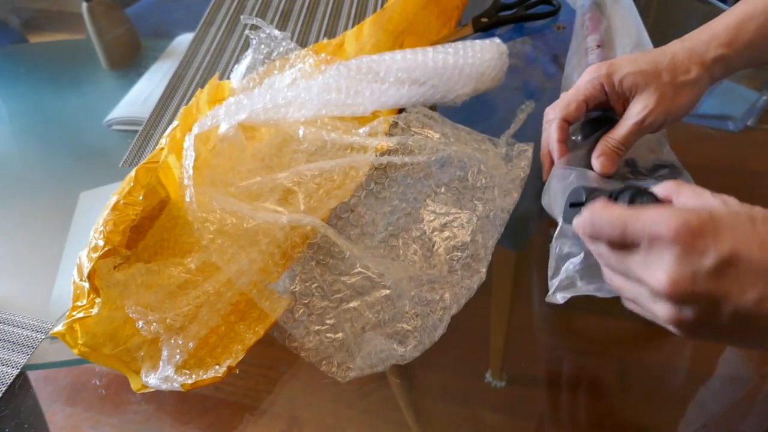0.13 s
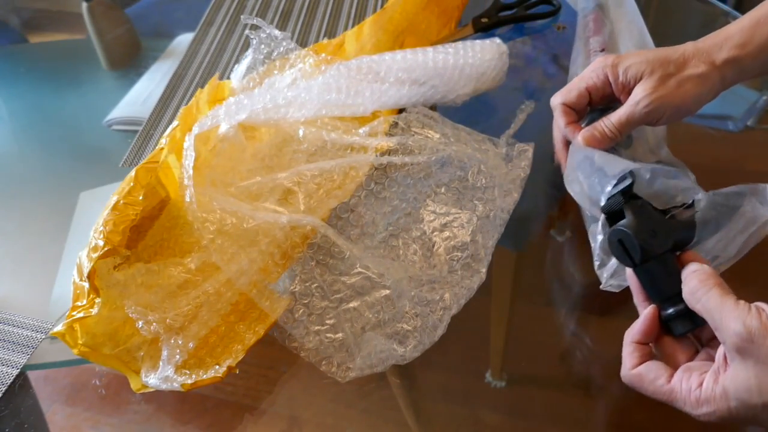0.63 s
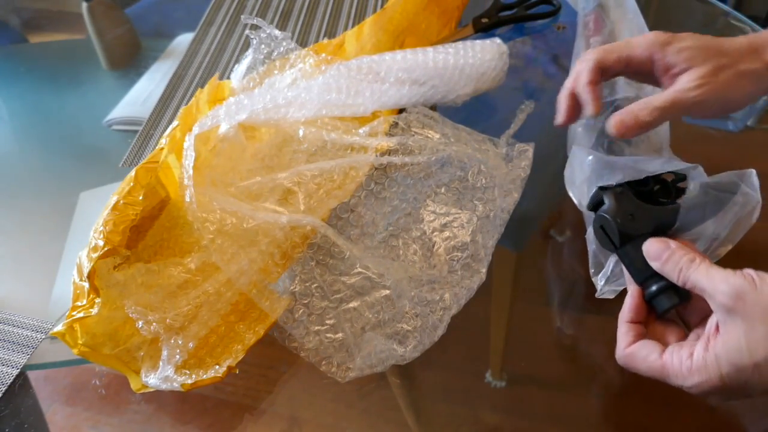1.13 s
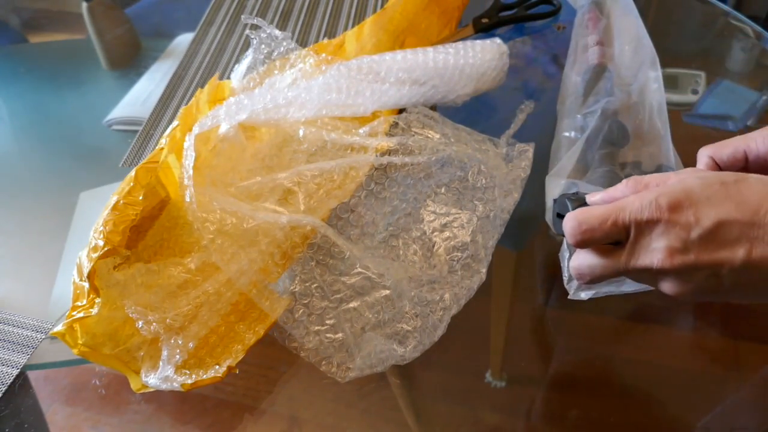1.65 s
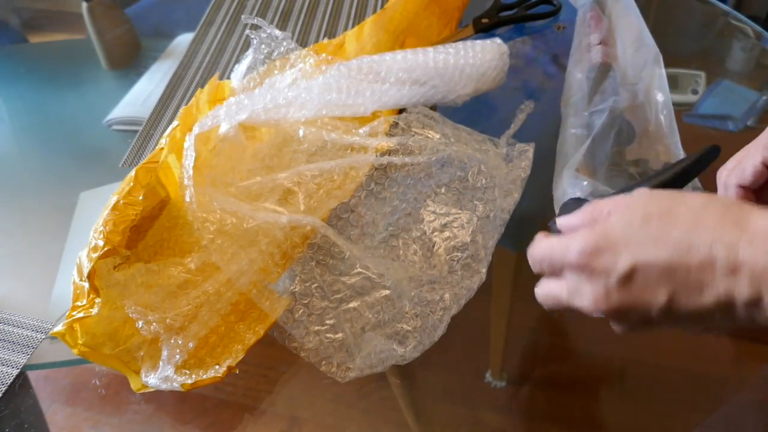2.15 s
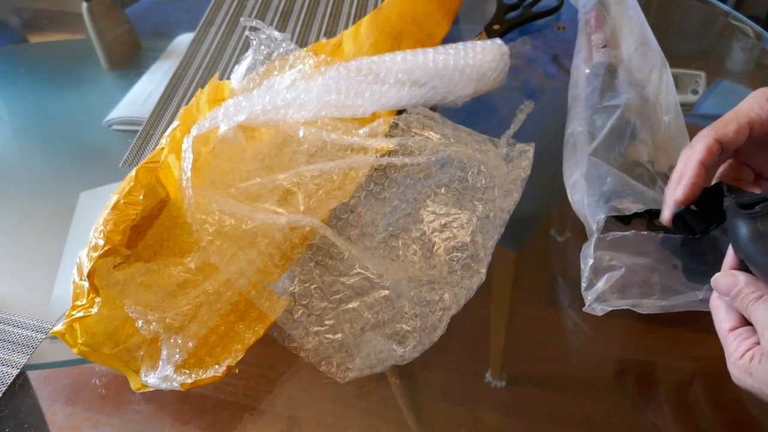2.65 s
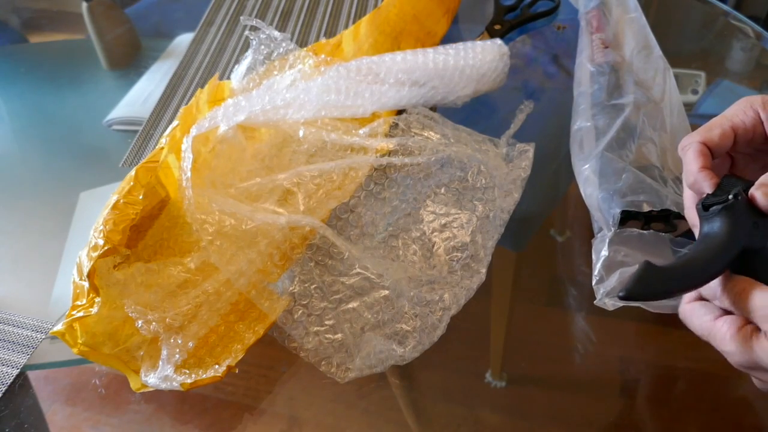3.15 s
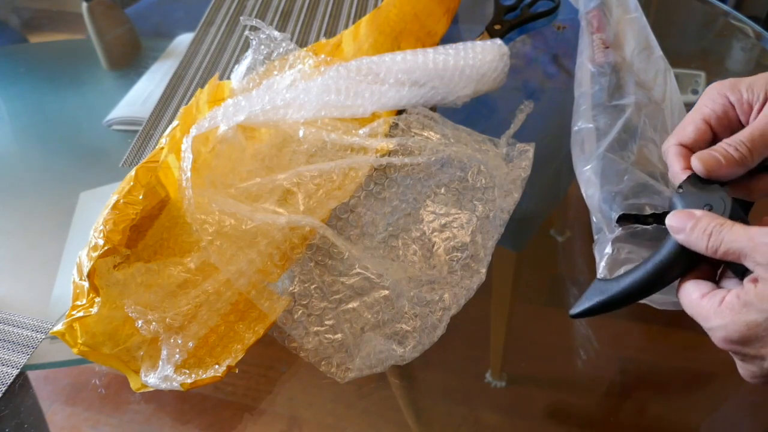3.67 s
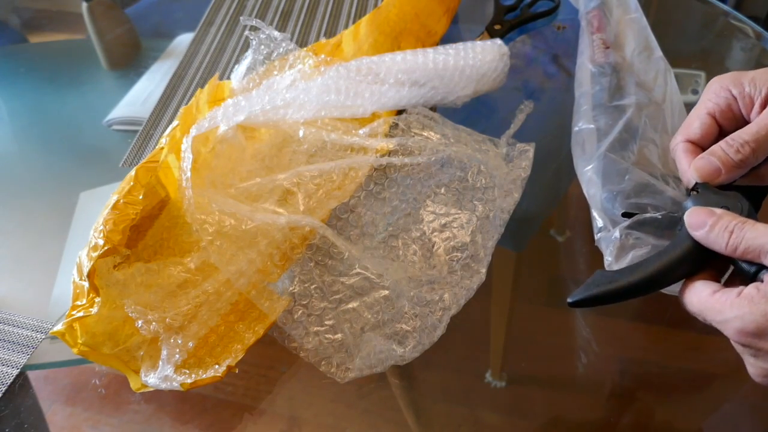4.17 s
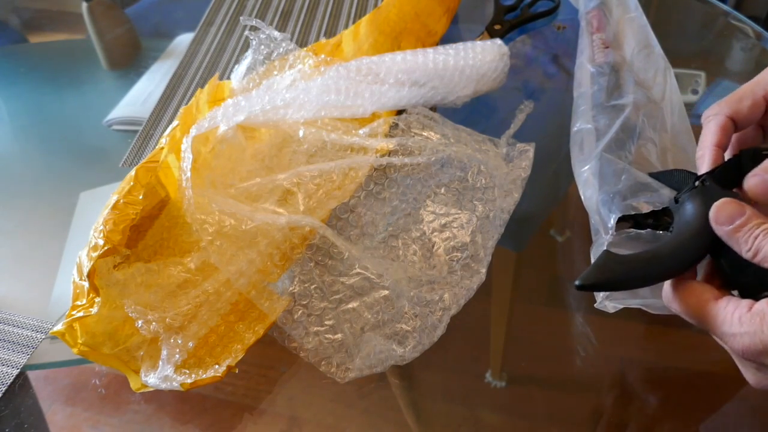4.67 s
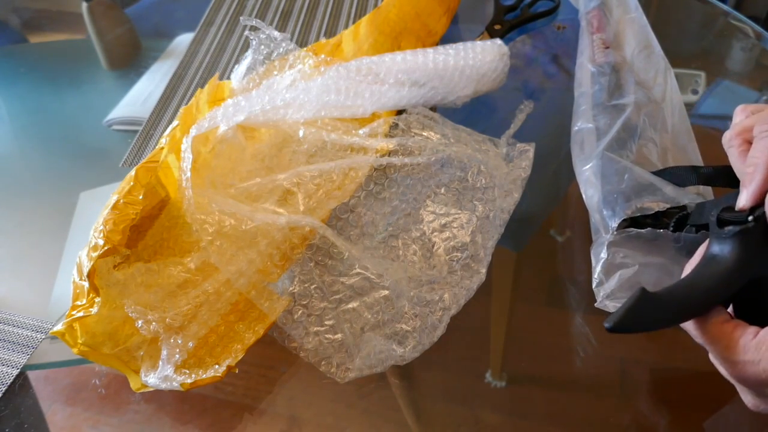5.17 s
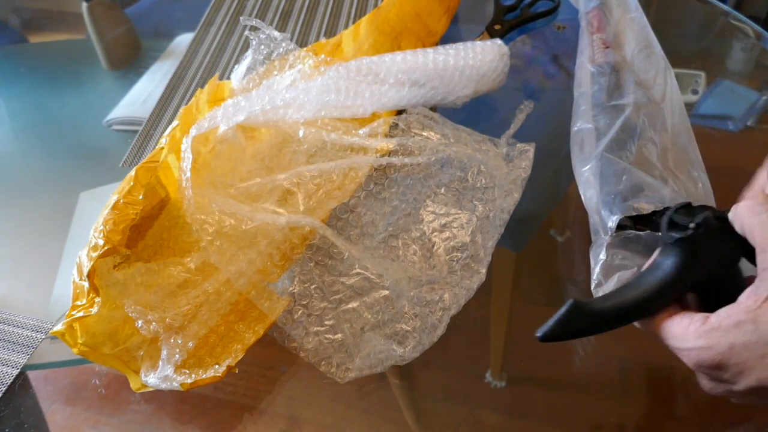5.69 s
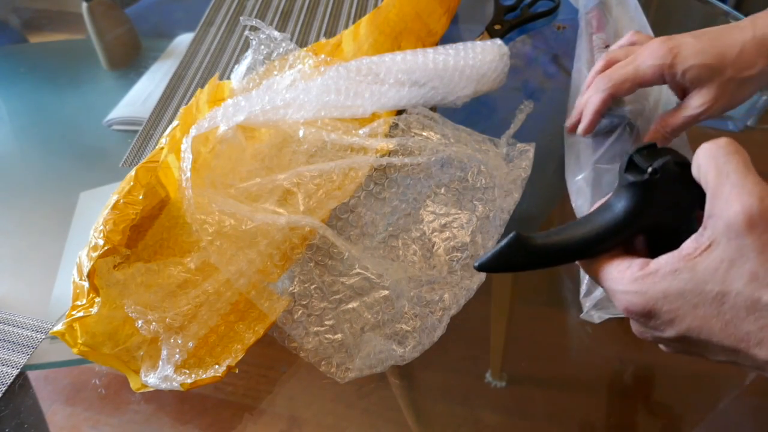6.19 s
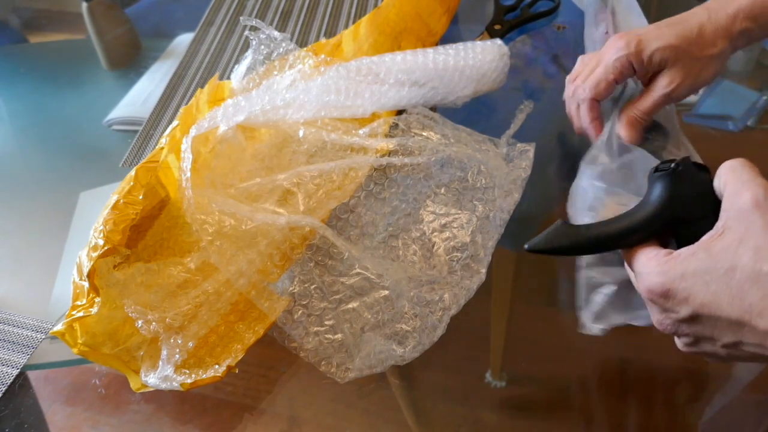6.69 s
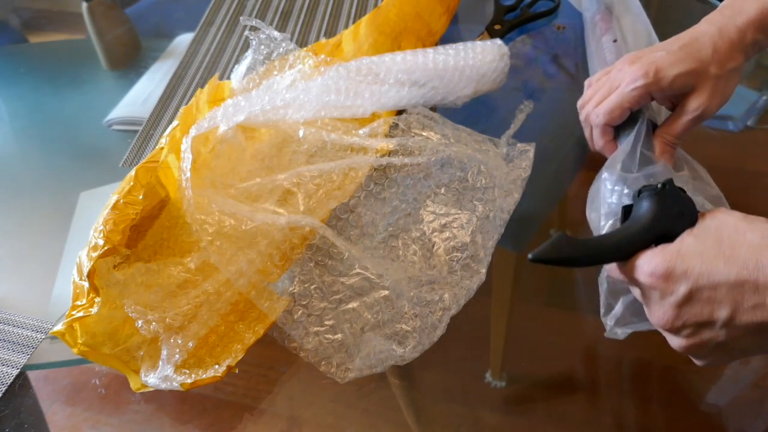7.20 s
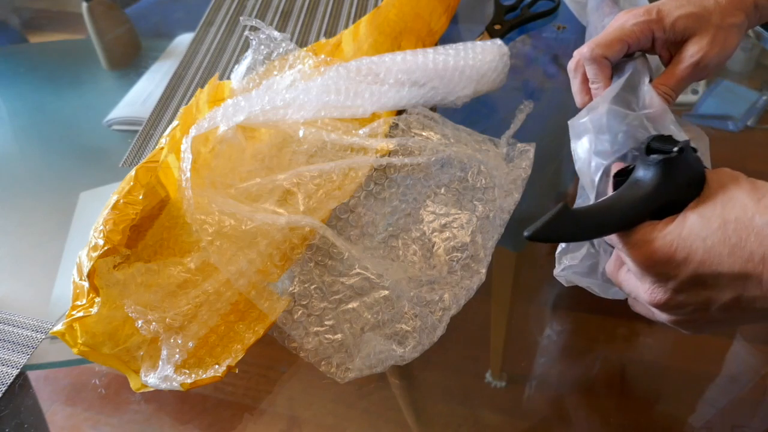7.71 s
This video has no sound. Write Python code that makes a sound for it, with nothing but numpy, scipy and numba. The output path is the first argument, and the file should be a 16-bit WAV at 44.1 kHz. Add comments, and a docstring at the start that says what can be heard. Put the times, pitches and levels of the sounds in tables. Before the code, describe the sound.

Close crackly plastic film rustling, one short rattling burst of hard knocks on a tabletop, a near-quiet lull with faint ticks, then vigorous crinkling again.

```python
"""Hands work at a thin plastic bag on a glass table, close to a small stereo microphone in a quiet room.
Bag: creases snap over singly or in showers, as short swelling rings and noise bursts coloured by the film.
Part: a hard plastic piece knocks on the table (decaying modes), with clacks, rattle and a rocking hum.
Room: a short noise tail behind both, over coloured noise and low booming notes.
Gain control turns loud moments down, most of all the knocks."""
import sys
import numpy as np
from scipy import signal
from scipy.fft import rfft, irfft, next_fast_len
from scipy.io import wavfile
from numba import njit

SR = 44100
rng = np.random.default_rng(int(sys.argv[2]) if len(sys.argv) > 2 else 0)


def voltage_ratio(decibels):
    """Convert decibels (scalar or array-like) to amplitude ratios, 20 dB per decade."""
    exponent = np.asarray(decibels, float) / 20
    return 10 ** exponent


def to_wav(sig):
    """Store sig (one row per channel, or 1-D mono) as 16-bit WAV at the path in sys.argv[1].

    Samples outside -1..1 are clipped; the rate is SR.
    """
    pcm = np.clip(np.atleast_2d(sig), -1, 1) * 32767
    pcm = np.round(pcm).astype(np.int16)
    wavfile.write(sys.argv[1], SR, pcm.T)  # frames by channels


N = 345289

# colour of the bag film: (frequency [Hz], relative level per Hz [dB])
FILM_COLOUR = [(88, -32.5), (150, 14), (183, -18), (210, -5.5), (393, -5), (434, -1), (847, -4.5),
               (934, -9), (2200, -6.5), (2920, -7), (4600, -12), (6050, -16.5), (10300, -20.5),
               (15000, -26), (16500, -52)]


def level(x, db):
    """Scale to an rms level in dB."""
    return x * voltage_ratio(db) / np.sqrt(np.mean(x ** 2))


def on_log(table, hz):
    """Read (frequency [Hz], value) points on a log frequency axis."""
    f, v = np.transpose(table)
    return np.interp(np.log(np.maximum(hz, 1)), np.log(np.maximum(f, 1)), v)


def colour(x, table):
    """Causal minimum-phase filter with the gain of (Hz, dB) points, from the folded cepstrum."""
    size = 2048
    log_gain = on_log(table, np.fft.rfftfreq(size, 1 / SR)) * np.log(10) / 20
    cepstrum = irfft(log_gain)
    cepstrum[1:size // 2] *= 2
    cepstrum[size // 2 + 1:] = 0
    response = irfft(np.exp(rfft(cepstrum)))[None, :size // 2]
    return signal.oaconvolve(x, response, axes=-1)[:, :N]


def band(x, lo_hz, hi_hz):
    """Gentle band-pass (second-order Butterworth prototype)."""
    return signal.sosfilt(signal.butter(2, [lo_hz, min(hi_hz, SR / 2.1)], "band", fs=SR, output="sos"), x)


def alike(size, like_hz):
    """Stereo noise: the side part is high-passed, so bass is common and treble unrelated."""
    mid, side = rng.standard_normal((2, size))
    side = signal.sosfilt(signal.butter(1, like_hz, "high", fs=SR, output="sos"), side)
    return np.array([mid + side, mid - side])


def hush():
    """Smooth background noise with booming notes, the lowest ones held steady by some motor."""
    # background colour: (frequency [Hz], relative level per Hz [dB])
    hush_colour = [(20, -11), (114, -16), (147, -6.5), (244, 1.5), (670, -13), (839, -10.5), (939, -15),
                   (1900, -19.5), (2890, -31), (7300, -41.5), (9950, -33), (12800, -35), (15200, -40),
                   (16500, -99)]
    # booming notes: (frequency [Hz], width [Hz], relative level [dB])
    hums = [(81, 16, -15.5), (117.6, 3.7, -10), (164.2, 8, -0.5), (205.8, 3.7, 1), (261.2, 9.8, -8.5),
            (415.8, 20, -2.5)]
    hush_db, hum_db = -49, -52.5
    notes, t = 0, np.arange(N) / SR
    for hz, width_hz, db in hums:
        steady_gain = voltage_ratio(db) / (1 + (hz / 200) ** 4)
        tone = np.sin(2 * np.pi * (hz * t + rng.random())) * steady_gain
        boom = band(alike(N, 750.0), hz - width_hz / 2, hz + width_hz / 2)
        notes = notes + tone + level(boom, db - 9.5)
    return level(colour(alike(N, 40.0), hush_colour), hush_db) + level(notes, hum_db)


def room(x):
    """Reverberation: x convolved with a noise tail that dies faster in the treble."""
    # reverberation time: (frequency [Hz], t60 [s])
    room_t60 = [(200, 0.31), (800, 0.29), (3000, 0.17), (10000, 0.14)]
    t = np.arange(SR // 2) / SR
    noise, tail = alike(len(t), 3800.0), 0
    for hz in 125 * 2. ** np.arange(8):
        decay = np.exp(-np.log(1000) * t / on_log(room_t60, hz))
        tail = tail + band(noise, hz / np.sqrt(2), hz * np.sqrt(2)) * decay
    tail = tail * np.minimum(t / 0.0037, 1)  # onset [s]
    unit_tail = tail / np.sqrt(np.sum(tail ** 2) / 2)
    return signal.oaconvolve(x[None], unit_tail, axes=-1)[:, :N]


def ports(x):
    """The two microphone ports colour and delay a near sound differently, each by half the contrast."""
    # phase contrast: (frequency [Hz], left lead [rad])
    port_phase = [(0, 0), (600, -0.3), (1720, 0.1), (4570, 0.1), (5170, 0.3), (5600, 0.7), (6030, 2.1),
                  (6550, 2.3), (7840, 1.9), (9730, 0.7), (12100, 0.3), (16200, 0.1)]
    # level contrast: (frequency [Hz], left minus right [dB])
    port_balance = [(110, 4), (200, 0), (380, 0), (700, -2), (1290, -5), (2380, 0), (4400, -3), (8120, 1.5),
                    (15000, 3.5)]
    size = next_fast_len(N)
    hz = np.fft.rfftfreq(size, 1 / SR)
    half = voltage_ratio(on_log(port_balance, hz) / 2) * np.exp(.5j * on_log(port_phase, hz))
    return irfft(rfft(x, size) * np.array([half, 1 / half]), size)[:, :N]


@njit
def rings(n, start, hz, fade, peak, lag, lean, turn):
    """Short rings that swell and die (t e^-t); right port lags by lag; start, fade, lag in samples."""
    out = np.zeros((2, n))
    for k in range(len(start)):
        step = np.exp(2j * np.pi * hz[k] / SR - 1 / fade[k])
        for ch in range(2):
            at = start[k] + ch * lag[k]
            i = int(np.ceil(at))
            age = i - at
            gain = peak[k] * lean[k] ** (1 - 2 * ch)
            z = gain * np.exp(1j * turn[k] + 1) / fade[k] * step ** age
            for j in range(max(i, 0), min(i + int(9 * fade[k]) + 2, n)):
                out[ch, j] += age * z.imag
                z *= step
                age += 1
    return out


def spray(s, peak, swell_ms, lo_hz, hi_hz):
    """Bursts of noise with the film's colour, each swelling for swell_ms and dying."""
    zero = np.zeros(len(s))
    # zero pitch and a quarter turn leave the bare t e^-t envelope
    shape = rings(N, s * SR, zero, zero + swell_ms * SR / 1000, peak, zero, zero + 1, zero + np.pi / 2)
    noise = band(colour(alike(N, 7800.0), FILM_COLOUR), lo_hz, hi_hz)
    return shape * level(noise, -5.0)


def rocking():
    """The part rocks on and keeps the lowest mode humming, as a sine of rising pitch."""
    start_s, attack_s, db = 2.79, 0.014, -23.5
    hz, rise_hz_per_s = 247, 155
    age = np.maximum(np.arange(N) / SR - start_s, 0)
    cycles = age * (hz + rise_hz_per_s * age / 2)
    return voltage_ratio(db) * np.minimum(age / attack_s, 1) * np.sin(2 * np.pi * cycles)


def knocks():
    """Every blow rings the same modes; a longer contact leaves the upper ones out; hard edges clack."""
    # blows of the part: (time [s], blow level [dB], contact [ms], clack level [dB])
    blows = [(2.612, -9.5, 0.33, -35), (2.617, -6, 0.22, -34), (2.627, -6.5, 0.27, -50),
             (2.651, -12, 0.35, -60), (2.663, -11, 0.26, -59.5), (2.683, -13.5, 0.36, -60),
             (2.699, -17, 0.32, -60), (2.722, -22.5, 0.074, -10), (2.734, -20, 0.06, -22),
             (2.746, -10, 0.46, -39), (2.763, -20.5, 0.22, -26), (2.797, -13, 0.66, -29.5),
             (2.82, -22, 0.43, -39), (2.845, -22.5, 0.3, -45)]
    # modes of part and table top: (nominal frequency [Hz], relative level [dB], t60 [s])
    modes = [(257, -1.5, 0.075), (414, 3, 0.042), (577, -1.5, 0.11), (646, 6.5, 0.044), (746, -2, 0.21),
             (838, -2.5, 0.16), (1150, 9.5, 0.033), (1310, 4, 0.09), (1450, 4, 0.2), (1736, 13.5, 0.018),
             (1686, -3, 0.17), (2060, 6, 0.05), (2396, 6.5, 0.14), (2630, 3.5, 0.12)]
    caught_s, still_s = 2.885, 0.0036  # a hand closes on the part and stills it
    hz, mode_db, t60 = np.transpose(modes)
    out, t = np.zeros((2, N)), np.arange(SR // 2) / SR
    chance = rng.standard_normal((len(blows), len(modes)))
    # neighbouring modes lean to opposite sides
    lean = voltage_ratio(1.7 * np.outer([1, -1], (-1) ** np.arange(len(hz))))
    decay = np.exp(-np.log(1000) * np.outer(1 / t60, t))
    for (s, db, contact_ms, _), luck in zip(blows, chance):
        softness = 1 + (hz * contact_ms / 400) ** 4
        gain = voltage_ratio(db + mode_db + 2.0 * luck) * np.sign(luck) / softness
        blow_hz = hz * (1 + 0.0124 * luck[::-1])
        ring = (gain * lean) @ (np.sin(2 * np.pi * np.outer(blow_hz, t)) * decay)
        onset = (1 - np.exp(-t * 1000 / contact_ms)) ** 2
        out[:, int(s * SR):int(s * SR) + len(t)] += ring * onset
    out += rocking()
    out = out * np.exp(-np.maximum(np.arange(N) / SR - caught_s, 0) / still_s)
    s, db, _, clack_db = np.transpose(blows)
    tick = spray(s, voltage_ratio(clack_db), 0.94, 3700, 17000)
    hiss = spray(s, voltage_ratio(clack_db - 3), 9.3, 4300, 13000)
    # loose pieces chatter after each blow
    rattle = spray(s, voltage_ratio(db - 4.5), 7.3, 310, 1880)
    return band(band(out, 100, 4200), 120, 9000) + rattle + tick + hiss


def handling(t):
    """Crackle level in dB for middle, treble and bass: the steady rustle plus every tug's shower."""
    # bag in restless hands: (time [s], level [dB], treble over level [dB], bass over level [dB])
    hand = [(0.0, -80, -17, 16), (0.899, -49, -6, -2), (1.72, -66, 12, 1), (2.2, -55, -14, -4),
            (2.599, -39, -0.5, -1), (2.95, -48, -3, 1), (3.28, -80, -13, -12), (3.6, -46, -8, 1.5),
            (3.8, -67, -3, -13), (5.3, -69, -12.5, 10), (5.6, -67, -15, 10.5), (6.11, -68, -8, -7),
            (6.16, -48, -2, -1.5), (7.12, -50, -17, -1), (7.83, -47, -12, 0)]
    # tugs that set off a shower of creases: (time [s], level [dB], 10 dB rise [s], 10 dB fall [s],
    # treble over level [dB], bass over level [dB]); rise and fall below 2 ms count as 2 ms
    tugs = [(-0.008, -31, 2.5, 0.09, -4.5, -6), (0.125, -37, 0.16, 0.14, -3, -6.5),
            (0.25, -27, 0.07, 0.074, -8, -8.5), (0.382, -43, -0.06, 0.16, -6.5, -26),
            (0.488, -37, 0, 0.13, -10.5, -6.5), (0.556, -39, -0.04, 0.0155, 6.5, 3.5),
            (0.638, -31, -0.0656, 0.04, -4.5, -9), (0.675, -28, -0.03, 0.077, -6, -12),
            (0.804, -37, 0.13, 0.11, -12.5, -2.5), (1.178, -33, 0.06, 0.1, -12.5, -6.5),
            (1.318, -33, -0.01, 0.17, -7.5, -10), (1.402, -31, 0.04, 0.13, -4.5, -8),
            (1.505, -33, 0.02, 0.06, -1.5, -4), (1.626, -34, 0.1, -0.02, -3, -4),
            (1.811, -30, 0.06, 0.0354, -8, -10), (1.937, -31, 0.0548, 0.11, -8, -7.5),
            (2.02, -39, 0.02, 0.06, -3, -24), (2.121, -37, 0.06, 0.13, -12, -7.5),
            (2.21, -45.5, -0.04, 0.15, 4.5, -13), (2.365, -40, 0.08, 0.05, -3, -4),
            (2.509, -39, -0.02, -0.02, 2, -21), (3.058, -52, 0.01, 0.2, -0.5, 0),
            (3.373, -47, 0.05, 0.1, -11, -9), (3.451, -42, 0.11, 0.15, -6, -7),
            (3.547, -38, 0.09, 0.067, -10, -4), (4.23, -55, -0.02, 0.07, -9, -3),
            (4.375, -52, 0.07, 0.12, -14, -24), (4.435, -54, 0.16, -0.02, 0, 3),
            (5.36, -54, 0.06, 0.17, -16, 2.5), (5.429, -48, -0.01, 0.11, -20, 2),
            (5.635, -45, 0.0138, 0.1, -10.5, -1.5), (5.811, -53, -0.02, 0.13, -5, 1),
            (6.113, -36, 0.0168, 0.07, -10, -7.5), (6.199, -30, 0.0041, 0.06, -8, -13),
            (6.263, -35, 0.03, 0.01, 1, -7.5), (6.32, -32, 0.05, 0.11, -11.5, -21),
            (6.382, -42, -0.04, 0.1, 4, -16), (6.47, -37, -0.0127, 0.06, -5.5, -24),
            (6.522, -34, 0.06, 0.15, -10, -17), (6.585, -26, 0, 0.06, -1, -17),
            (6.624, -26, 0.0262, 0.046, 0, -4), (6.744, -35, 0.1, 0.1, -2, -6),
            (6.821, -31, 0.0349, -0.01, -8.5, -14), (6.95, -30, 0.0855, 0.12, -9.5, -10.5),
            (7.04, -25, 0.0361, 0.01, -5, -12.5), (7.158, -36, -0.017, 0.15, -4, -7.5),
            (7.227, -39, 0.004, 0.03, 0, -9), (7.262, -34, -0.0135, 0.04, -3.5, -4),
            (7.304, -30, 0.05, 0.05, -11.5, -17), (7.361, -31, -0.01, 0.02, -12, -11),
            (7.424, -36, 0.0448, 0.1, -7.5, -3.5), (7.537, -39, 0.0554, 0.1, -3.5, -4.5),
            (7.709, -36, 0.0245, 0.16, -1.5, -5), (7.762, -36, 0.1141, 0, -16, -8),
            (7.811, -31.5, -0.0224, 0.25, -2.5, -4)]
    s, db, treble_db, bass_db = np.transpose(hand)
    power = np.array([voltage_ratio(2 * np.interp(t, s, db + over_db)) for over_db in (0, treble_db, bass_db)])
    for s, db, rise_s, fall_s, treble_db, bass_db in tugs:
        rise_s, fall_s = np.maximum([rise_s, fall_s], .002)
        now = slice(*np.searchsorted(t, [s - 5 * rise_s, s + 5 * fall_s]))
        slope_db = -10 * np.maximum((t[now] - s) / fall_s, (s - t[now]) / rise_s)
        over_db = np.array([[0], [treble_db], [bass_db]])
        power[:, now] += voltage_ratio(2 * (db + slope_db + over_db))
    return 10 * np.log10(power)


def crease(s, hz, cycles, peak, chance):
    """Rings of creases, each at its own spot on the film, so lag and balance scatter."""
    lag_us, lean_db = 16.0, 1.0
    lag = chance[:, 0] * lag_us * SR / 10 ** 6
    lean = voltage_ratio(lean_db * chance[:, 1])
    return rings(N, s * SR, np.minimum(hz, SR / 2.2), cycles * SR / hz, peak, lag, lean, np.pi * chance[:, 2])


def crackle():
    """A shower of creases, denser under a firmer hand; each sounds from bass to treble at once."""
    per_s, busier, shared = 1500., .06, 0.49  # creases/s at -35 dB, density per handling dB, common force
    after_s = 0.0109  # the shower trails the snap that sets it off
    t = np.arange(N) / SR
    near_db, treble_db, bass_db = handling(t - after_s)
    busy = voltage_ratio(busier * (near_db + 35))
    count = 40000
    due = np.cumsum(rng.exponential(size=count))
    force = rng.exponential(size=count)
    at = np.interp(due, np.cumsum(busy) * per_s / SR, t)
    live = at < t[-1]
    # layers of film slide over each other and hiss
    hiss = band(colour(alike(N, 7000.), FILM_COLOUR), 4530, 15200)
    out = level(hiss, -9.5) * voltage_ratio(treble_db)
    # (low edge Hz, high edge Hz, level dB, force scatter dB, fade in cycles)
    for lo_hz, hi_hz, db, scatter_db, cycles in ((215.4, 848, bass_db - 2.0, 3.7, 0.57),
                                                 (781, 2735, near_db - 1.0, 4.9, 1.1),
                                                 (2630, 5700, treble_db - 5.0, 4.5, 1.5),
                                                 (5450, 15000, treble_db - 15.0, 2.5, 0.76)):
        spot, chance = rng.random(count), rng.standard_normal((count, 5))
        hz = lo_hz * (hi_hz / lo_hz) ** spot
        push = np.minimum(shared * force + (1 - shared) * rng.exponential(size=count), 4)
        # peaks rise with pitch, so the shower is white before the film colours it
        peak = hz * voltage_ratio(scatter_db * push + 0.94 * chance[:, 3])
        fade_cycles = cycles * voltage_ratio(1.97 * chance[:, 4])
        shower = crease(at[live], hz[live], fade_cycles[live], peak[live], chance[live])
        # density moves the grain, not the level
        even = band(colour(shower, FILM_COLOUR), lo_hz, hi_hz) / np.sqrt(busy)
        out = out + level(even, 0) * voltage_ratio(db)
    return out


def snaps():
    """A loud crease: a few cycles at its pitch inside a broad burst, and a thump."""
    # single loud creases: (time [s], nominal peak [dB], pitch [Hz],
    # upper middle over peak [dB], tick over peak [dB]); each layer adds its own offset
    creases = [(0.0178, -17.5, 2360, -25, -33), (0.0842, -21.5, 2370, -11, -26),
               (0.110, -25, 2400, -9, -14), (0.2572, -17.5, 2340, -4, -22), (0.39, -21.5, 1690, -12, -26),
               (0.4321, -26.5, 3280, -12, -26), (0.4954, -19, 2060, -8, -19.5),
               (0.5321, -26.5, 1310, -20, -33), (0.5512, -28, 1870, -15, -28), (0.5598, -27, 3450, 1.5, -8),
               (0.5637, -25, 1280, -4, -7), (0.6427, -19.5, 1600, -1.5, -15), (0.678, -14, 3400, -15, -16),
               (0.6938, -23, 1730, -10, -9), (0.7452, -30, 1210, -11, -21), (0.7982, -23, 1210, -6.5, -34),
               (0.9703, -17.5, 1870, -12.5, -37), (1.0205, -21.5, 1910, -8, -15.5),
               (1.1127, -25, 1940, -12, -26), (1.1355, -20.5, 3220, -8, -22), (1.186, -16, 1730, -25, -42),
               (1.3246, -16, 1740, -13, -30), (1.3642, -16.5, 2000, -1.5, -24),
               (1.3963, -21.5, 1330, -20, -30), (1.5055, -21, 2500, -10, -30), (1.5964, -23, 1310, -7, -16),
               (1.6306, -20, 1950, -10, -25), (1.6523, -20, 2090, -9, -18), (1.7664, -31, 2180, -15, -30),
               (1.8, -20.5, 1590, -9, -25), (1.8237, -18.5, 1620, -12, -32), (1.8342, -24, 1710, -19, -21),
               (1.8502, -18.5, 1600, -7, -11), (1.8971, -25.5, 980, -10, -18),
               (1.9439, -19, 1250, -5.5, -33), (1.983, -25, 1300, -8, -25), (2.019, -25, 1580, -5, -13),
               (2.119, -25, 1450, -13, -25), (2.2155, -20, 3780, -14, -8.5), (2.2789, -25, 2470, -17, -31),
               (2.3254, -20.5, 3110, -18, -29), (2.3501, -27, 1830, -15, -29), (2.4573, -26, 1209, -7, -17),
               (2.5035, -26.5, 1194, -4, -11), (2.961, -35, 1150, -11, -27), (3.0649, -39, 1310, -3, -24),
               (3.372, -31.5, 1710, -23, -31), (3.4635, -33, 1970, -19, -22), (3.5373, -36, 2040, -16, -24),
               (3.6092, -29, 1316, -19, -22), (4.0085, -43, 1300, -13, -30), (4.103, -40, 1210, -17, -30),
               (4.2305, -39.5, 1290, -11, -21), (4.3306, -37.5, 1620, -23, -32),
               (4.3735, -39, 1740, -20, -27), (4.4547, -39, 1520, -20, -14), (4.798, -44.5, 1110, -12, -28),
               (5.2626, -47, 1390, -20, -30), (5.3583, -45, 1280, -17, -18), (5.436, -33.5, 1310, -25, -32),
               (5.443, -33.5, 1470, -28, -32), (5.4727, -40, 1170, -29, -28), (5.658, -35, 2300, -12, -31),
               (5.737, -43, 2390, -13, -30), (5.7981, -36.5, 1310, -11, -15), (5.858, -38, 1500, -10, -28),
               (6.124, -24.5, 2060, -14, -25), (6.2045, -18.5, 1740, -11, -35),
               (6.2609, -15.5, 2323, -11, -33), (6.2673, -16, 2000, -14, -26),
               (6.2913, -17, 1730, -24, -24), (6.32, -19.5, 2390, -13, -24), (6.393, -20.5, 1460, -4, -0.5),
               (6.439, -24.5, 1606, -6, -10), (6.4728, -22, 1936, -11, -15), (6.4987, -22, 1520, -9, -13.5),
               (6.5172, -17.5, 2040, -7.5, -25), (6.5817, -14.5, 1710, -13, -20),
               (6.6018, -14.5, 1770, -13, -12.5), (6.721, -23.5, 1917, -20, -18),
               (6.7526, -16.5, 1783, -17, -14.5), (6.8201, -15, 2200, -14, -21),
               (6.885, -23, 2410, -12, -31), (6.909, -26.5, 1310, 0, -13), (6.9293, -20, 1740, -14, -26),
               (6.9572, -16.5, 1790, -23, -17.5), (6.997, -21.5, 1310, -16, -29),
               (7.032, -13, 2070, -26, -26), (7.0428, -9.5, 1940, -23, -23),
               (7.1432, -25.5, 1380, -11, -16), (7.1598, -20, 2427, -6.5, -17),
               (7.2296, -19.5, 1334, -6, -17), (7.2556, -28, 1635, -7, -12), (7.2677, -15.5, 2737, -6, -20),
               (7.2806, -24, 2286, -9, -16), (7.3054, -17.5, 1500, -10, -30),
               (7.3662, -13, 2086, -15.5, -38), (7.431, -21, 1330, -6, -15), (7.4608, -24, 1787, -20, -36),
               (7.5178, -23, 1700, -17, -32), (7.5388, -18, 1240, -9, -21), (7.5648, -22, 2315, -7, -18),
               (7.6276, -25, 1777, -11, -21), (7.6717, -28, 1363, -3, -21), (7.708, -18, 2630, -8, -21),
               (7.7533, -24, 1475, -16, -22), (7.7717, -20.5, 2735, -14, -13),
               (7.8175, -17, 2460, -11, -34)]
    s, db, hz, upper_db, treble_db = np.transpose(creases)
    chance = rng.standard_normal((len(s), 2, 5))
    # the brighter a crease, the less it rings at one pitch and the more it bursts
    bright_db = 0.32 * (upper_db + 18)
    ring = crease(s, hz, 1.28, voltage_ratio(db - 1 - bright_db), chance[:, 0])
    thump_hz = 480 * voltage_ratio(2 * chance[:, 1, 3])
    thump = crease(s, thump_hz, 0.4, voltage_ratio(db - 19 + 3.9 * chance[:, 1, 4]), chance[:, 1])
    body = spray(s, voltage_ratio(db - 9 + bright_db), 0.98, 750, 3300)
    edge = spray(s, voltage_ratio(db + upper_db + 5), .45, 2700, 5400)
    tick = spray(s, voltage_ratio(db + treble_db + 6), .8, 5400, 17000)
    return ring + thump + body + edge + tick


def scene():
    """Bag and part, near and through the room, over the background."""
    bag_room_db, table_room_db = -6, -1
    bag = crackle() + band(snaps(), 196, 20000)
    part = knocks()
    part_far = band(band(part[0], 340, 18000), 340, 18000)
    far = room(voltage_ratio(bag_room_db) * bag[0] + voltage_ratio(table_room_db) * part_far)
    return ports(bag + part + far) + hush()


@njit
def follow(x, attack, release):
    """Peak follower: one-pole smoothing, with attack and release coefficients per sample."""
    e, out = 0., np.empty(len(x))
    for i in range(len(x)):
        e += (x[i] - e) * (attack if x[i] > e else release)
        out[i] = e
    return out


def roll_off(x):
    """The treble ends steeply here."""
    return signal.sosfilt(signal.butter(12, 16650, fs=SR, output="sos"), x)


def record(dry):
    """Gain control turns loud moments down, tanh rounds the peaks, the capsule drops the deep bass."""
    knee_db, squeeze, ceiling = -14, 0.89, 1.0
    attack_s, release_s = 0.002, 0.13
    envelope = follow(abs(dry).max(0), 1 / (attack_s * SR), 1 / (release_s * SR))
    gain = np.minimum(voltage_ratio(knee_db) / (envelope + 1e-9), 1) ** squeeze
    tamed = ceiling * np.tanh(dry * gain / ceiling)
    mix = signal.sosfilt(signal.butter(2, 48., "high", fs=SR, output="sos"), tamed)
    return roll_off(mix)


dry = scene()
out = record(dry)
to_wav(out)
```